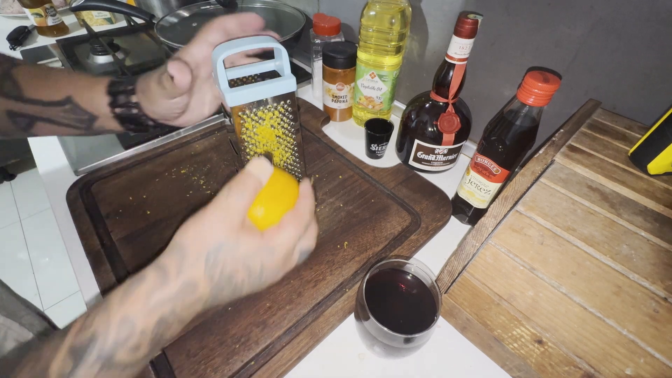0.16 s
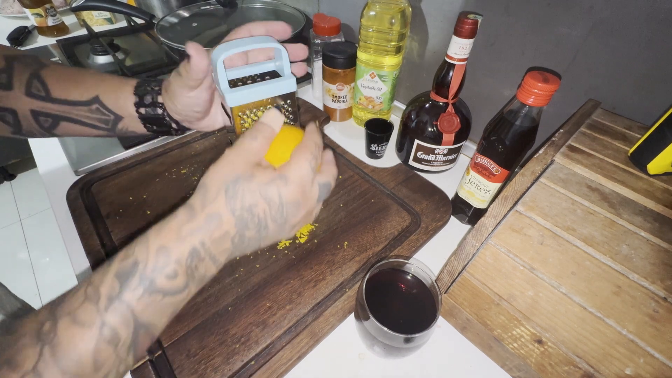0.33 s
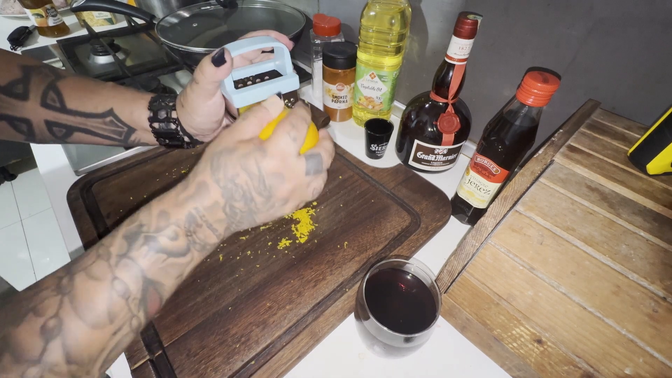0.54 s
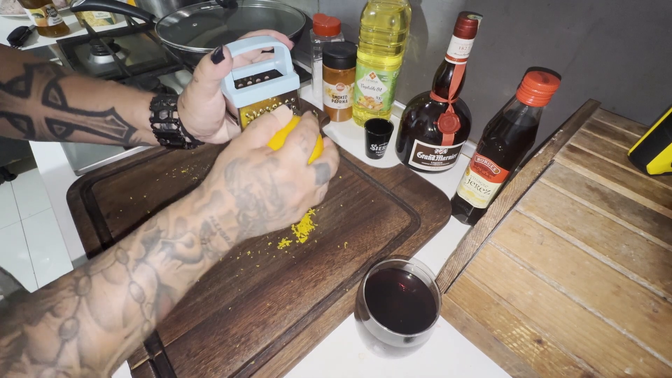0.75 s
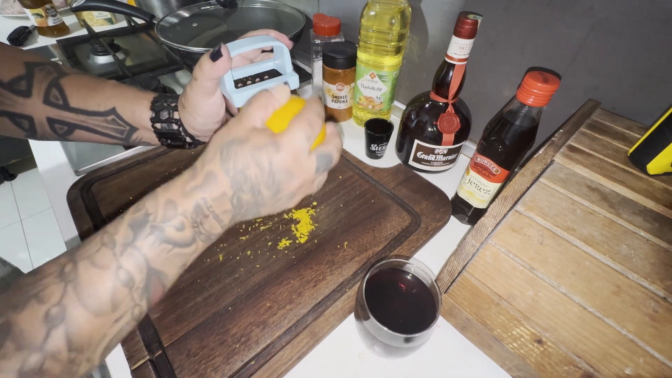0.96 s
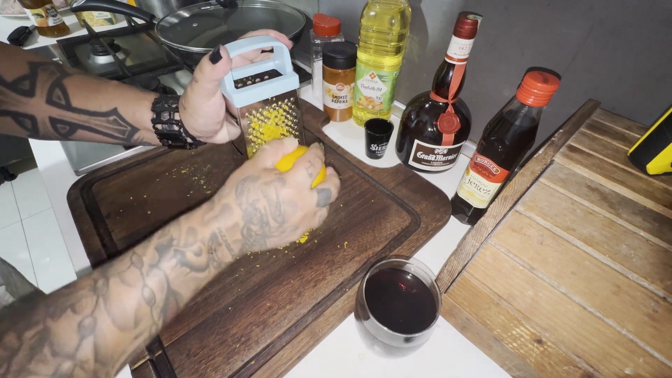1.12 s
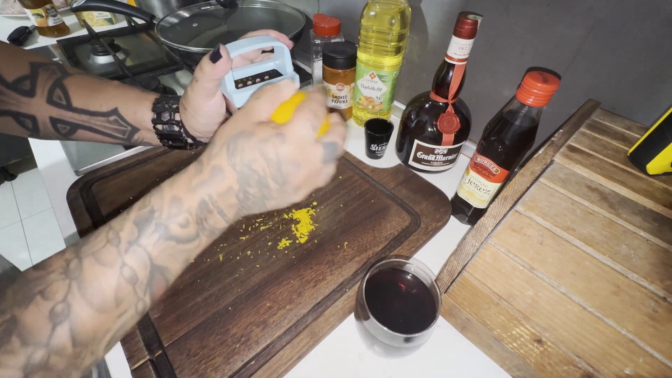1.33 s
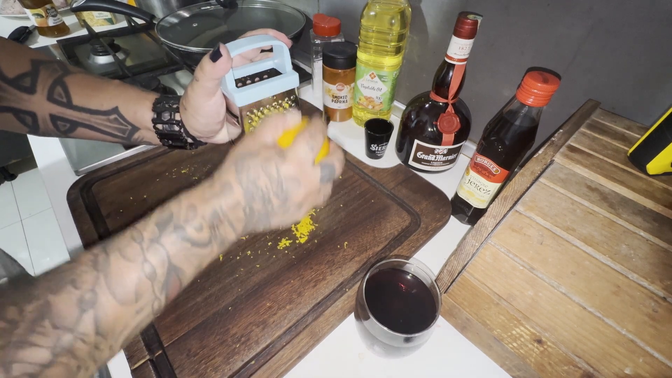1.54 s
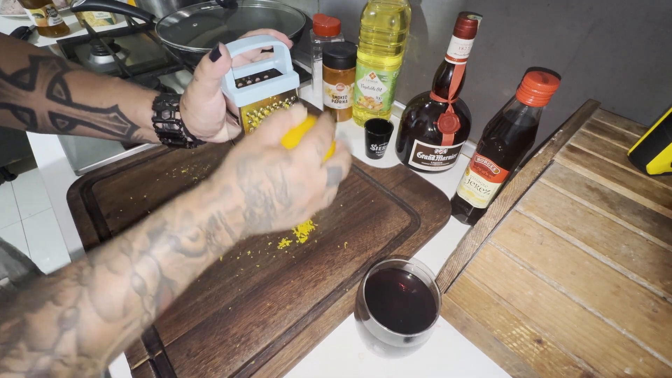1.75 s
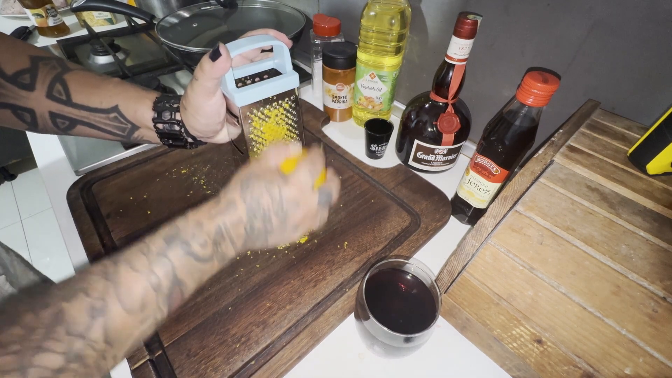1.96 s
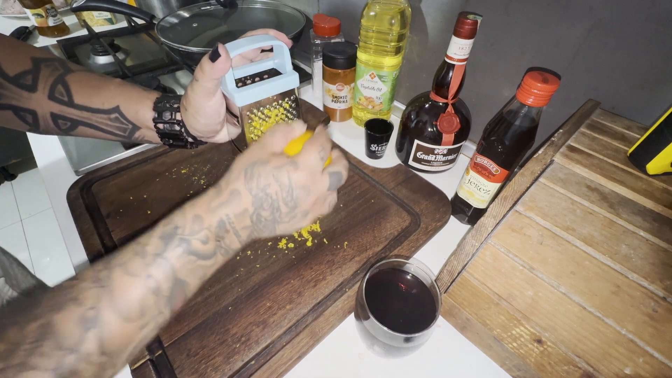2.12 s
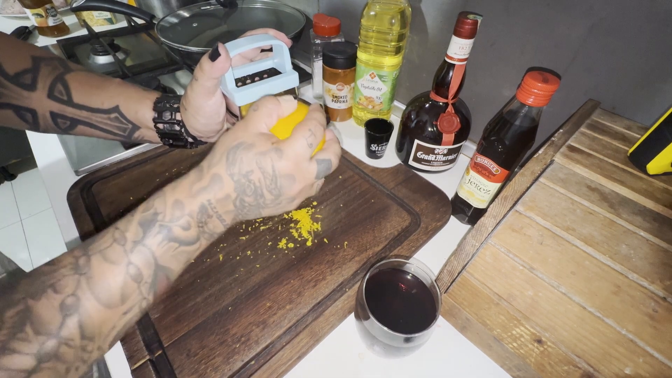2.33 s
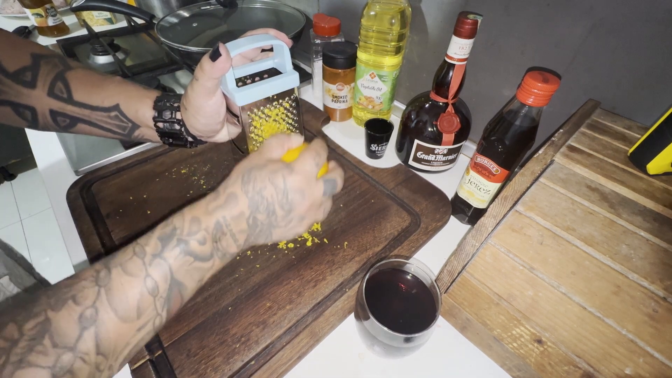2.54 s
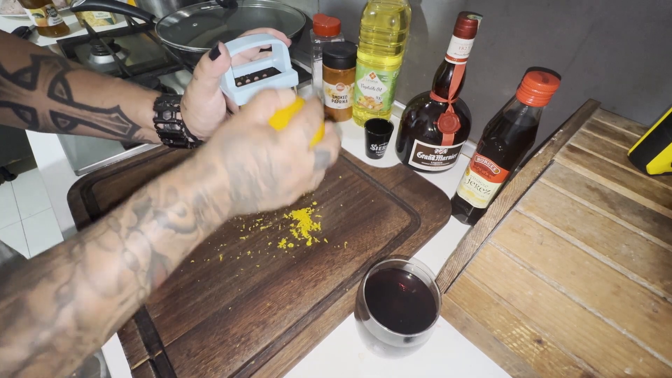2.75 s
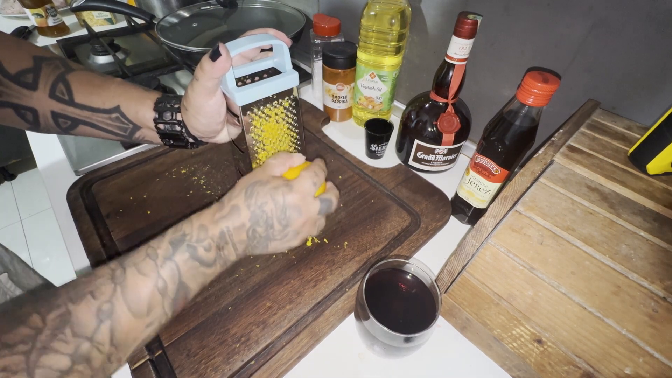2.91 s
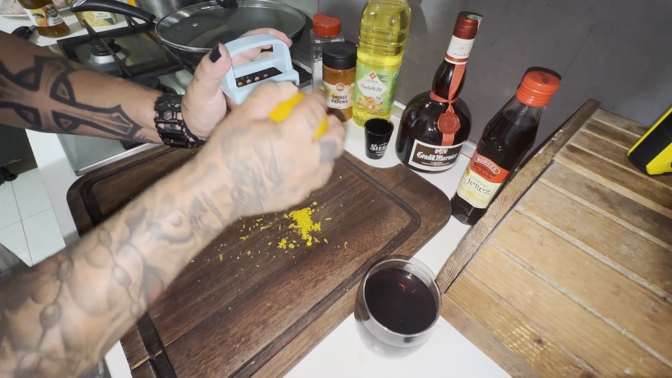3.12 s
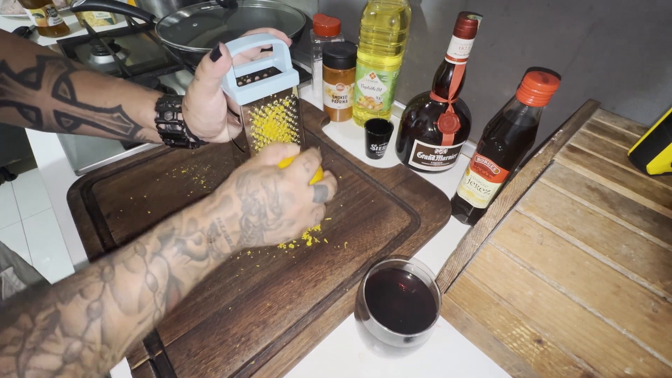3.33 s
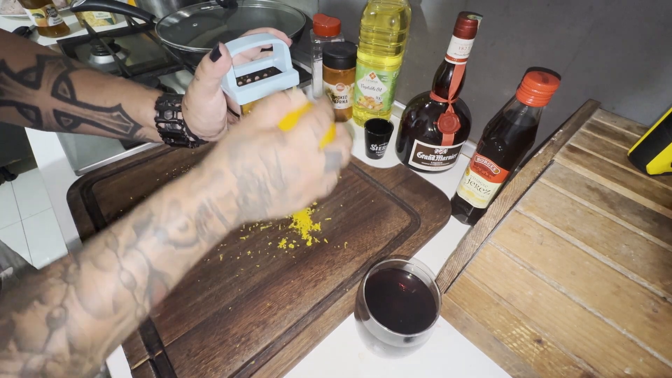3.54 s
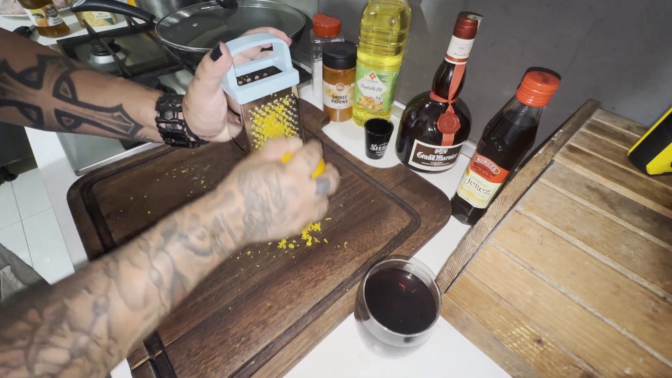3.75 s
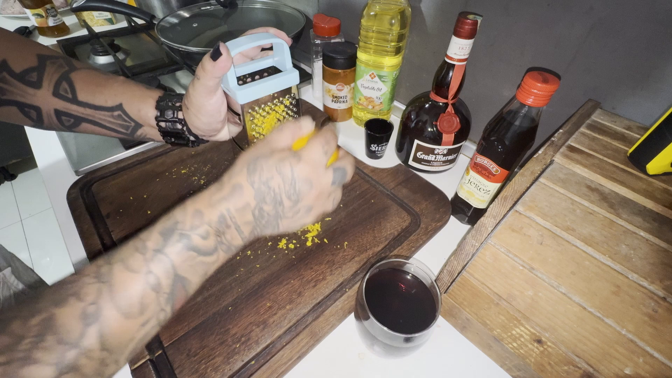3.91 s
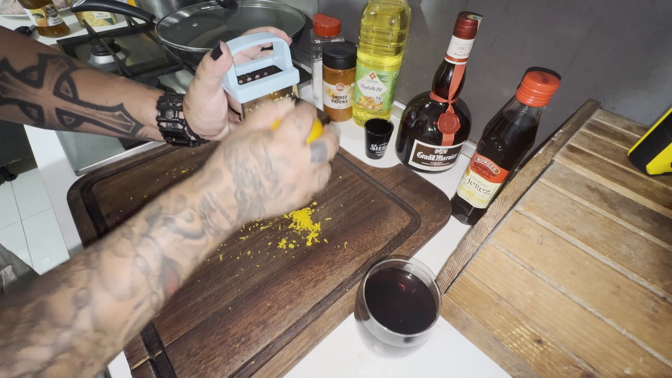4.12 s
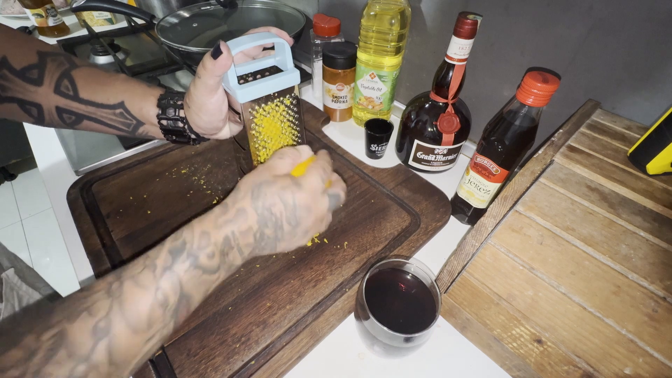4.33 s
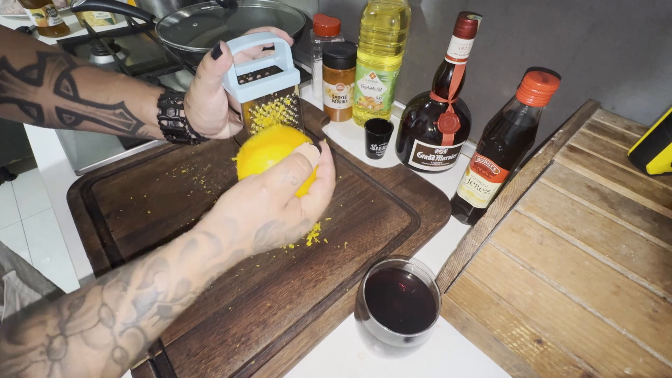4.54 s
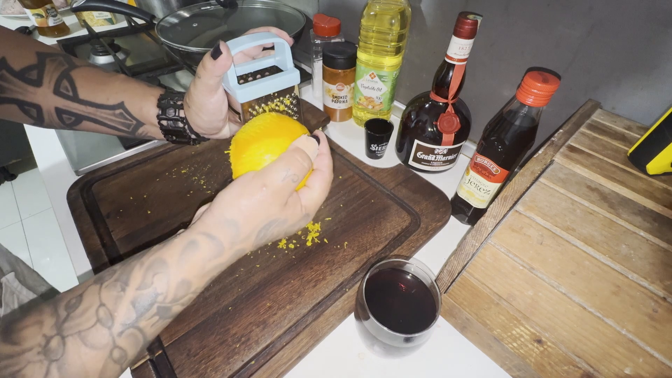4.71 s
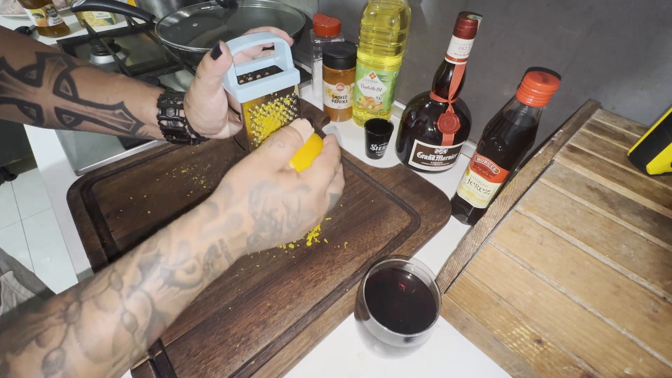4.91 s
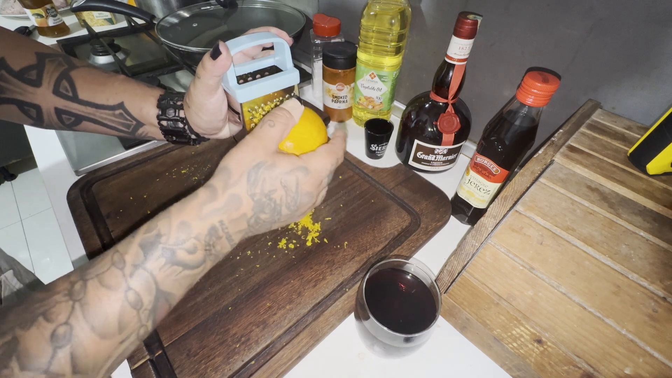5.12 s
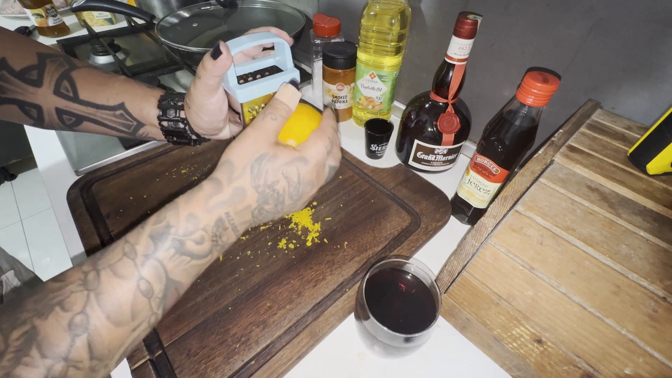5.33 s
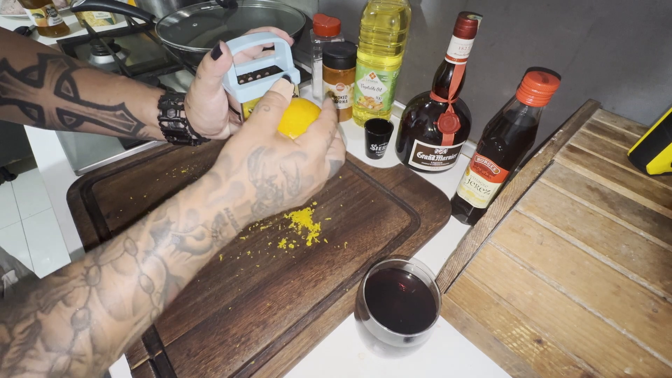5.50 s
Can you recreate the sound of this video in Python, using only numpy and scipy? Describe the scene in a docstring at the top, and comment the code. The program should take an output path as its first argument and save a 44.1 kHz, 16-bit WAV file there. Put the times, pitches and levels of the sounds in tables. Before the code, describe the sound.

A quiet kitchen with a faint, low room noise, heard close in stereo. At about 0.4 s fruit touches a steel grater with a small crunch, and its foot tips onto a wooden board with a dull double thump and short clack. Light touches and a soft bump follow near 0.75 s. From 1.0 s come eight short zesting strokes, starting near 1.0, 1.5, 1.9, 2.4, 2.8, 3.2, 3.6 and 4.05 s, each roughly a tenth of a second or slightly longer. Every stroke is a grainy, wet tearing rasp that swells and stops abruptly, with a brief tinny ring of sheet metal. Low, boomy board thumps accompany and separate them, strong near 2.0 and 2.9 s, heaviest at 4.24 s as the last stroke ends. Small crunches mark the fruit's return between strokes. Afterwards the scraping ceases; only barely audible rubs and touches occur around 4.75 to 5.7 s.

```python
"""In a kitchen, a citrus fruit is zested on a steel box grater that stands on a wooden board.
In each of eight strokes clumped noise snaps tear the peel, hissing and ringing the modes of sheet steel.
The fruit touches the teeth with short crunches, and sinking low cycles thump the grater's foot on the board.
After the strokes the fruit is only turned in the hand: light rubs and touches, over a faint room noise."""
import sys
import numpy as np
from scipy import signal
from scipy.fft import rfft, irfft, next_fast_len
from scipy.io import wavfile
from scipy.ndimage import map_coordinates

SR = 44100
rng = np.random.default_rng(int(sys.argv[2]) if len(sys.argv) > 2 else 0)


def file_out(sig):
    """Save sig as 16-bit WAV at sys.argv[1]."""
    # one column per channel
    cols = np.atleast_2d(sig).T
    # limit, then scale
    lim = np.clip(cols, -1, 1)
    pcm = np.round(lim * 32767).astype(np.int16)
    wavfile.write(sys.argv[1], SR, pcm)


N = 249955
TIME = np.arange(N) / SR
SIZE = next_fast_len(N + SR)
HZ = np.fft.rfftfreq(SIZE, 1 / SR)

# The grater's foot thumps on the board; levels are relative within each layer:
# start_s, thump_level_db, settled_pitch_hz, dull_knock_level_db, rock_back_against_thump_db
THUMPS = [(0.423, -39, 100, -31.5, -21), (0.443, -25, 92, -22.5, -14), (0.467, -25.5, 115, -33, -18.5),
          (0.759, -27, 85, -37, -10.5), (0.96, -24, 106, -33, -12.5), (1.079, -31, 101, -41.5, -15.5),
          (1.196, -24.5, 106, -37.5, -10.5), (1.366, -24.5, 98, -26.5, 1), (1.536, -30, 92, -40, -11),
          (1.702, -23, 108, -28.5, -11.5), (1.879, -29, 85.5, -41, -14.5),
          (1.961, -24.5, 121, -40.5, -16.5), (2.012, -16, 100.7, -38.5, -11), (2.254, -22, 115, -28.5, -5),
          (2.386, -28.5, 103, -47, -6), (2.735, -24, 90, -28.5, -2), (2.919, -15, 82, -41, -6),
          (3.163, -29, 62, -33, -0.5), (3.253, -21.5, 110, -43, -9.5), (3.345, -22.5, 102, -41.5, -13),
          (3.539, -35.5, 76, -52.5, -11), (3.605, -27.5, 101, -35, -9), (3.789, -26.5, 85, -47, -10.5),
          (3.972, -36.5, 90, -58.5, -14.5), (4.042, -33, 98, -28, -10.5), (4.24, -10.5, 83.7, -31, -8.5),
          (4.399, -33, 69, -42, -13), (4.519, -41, 101, -63, -9.5), (5.491, -44.5, 113, -66.5, -7)]


def gain_of(db):
    """Decibels to amplitude."""
    return 10 ** (np.asarray(db) / 20)


def evened(x):
    """Scales to an rms of one."""
    return x / np.sqrt(np.mean(np.abs(x) ** 2) + 1e-20)


def read(points, hz):
    """Reads a table of (Hz, value) on a log-frequency axis."""
    point_hz, value = np.transpose(points)
    return np.interp(np.log(hz + 1), np.log(point_hz + 1), value)


def add(mix, s, sound):
    """Adds a sound at time s, cut off at the end of the mix."""
    part = mix[max(round(s * SR), 0):][:len(sound)]
    part += sound[:len(part)]


def colour(x, gain):
    """Causal minimum-phase filter with the given gain at each frequency."""
    log_gain = np.log(np.maximum(gain, 1e-5))
    # folding the cepstrum onto positive times makes the filter causal
    cepstrum = irfft(log_gain, SIZE)
    cepstrum[1:SIZE // 2] *= 2
    cepstrum[SIZE // 2 + 1:] = 0
    response = np.exp(rfft(cepstrum))
    return irfft(rfft(x, SIZE) * response, SIZE)[:N]


def ring(x, modes):
    """Sum of damped resonances (Hz, dB, t60 s), each with its dB as the gain at its peak."""
    out = np.zeros_like(x)
    for hz, db, t60 in modes:
        decay = gain_of(-60 / (t60 * SR))  # amplitude kept per sample
        pole = decay * np.exp(2j * np.pi * hz / SR)
        # the tiny offset keeps the filter out of very slow arithmetic
        resonance = signal.lfilter([1 - decay], [1, -pole], x + 1e-18).real
        out += 2 * gain_of(db) * resonance
    return out


def wander(rate_hz):
    """Smooth random curve with an rms of one, through two random knots per cycle of its rate."""
    knots = rng.standard_normal(N // 50)
    return evened(map_coordinates(knots, [TIME * 2 * rate_hz + 5], order=2))


def shifting(x, paths, rate_hz):
    """Sends a sound over several paths whose shares drift at random, so no fixed colour stands out."""
    shares = np.array([wander(rate_hz) for path in paths])
    shares /= np.linalg.norm(shares, axis=0)
    return sum(signal.oaconvolve((x * share)[None], path, axes=1)[:, :N]
               for share, path in zip(shares, paths))


def quiet_kitchen(level_db=-55.5):
    """The quiet kitchen is two unrelated steady noises of one colour."""
    # Colour of the room noise: frequency_hz, relative_density_db_per_hz
    floor_colour = [(15, -37.5), (25, -12), (54, 5), (106, 1), (309, -15), (927, -20), (1810, -29),
                    (2300, -29), (3180, -38), (7480, -47), (11200, -40), (15000, -50.5)]
    noise = rfft(rng.standard_normal((2, SIZE)))
    return gain_of(level_db) * evened(irfft(noise * gain_of(read(floor_colour, HZ)), SIZE)[:, :N])


def kitchen(x, build_s=0.0011, drift_hz=14, count=7):
    """The room answers with diffuse noise tails in which each band dies at its own speed."""
    # Reverberation of the kitchen: frequency_hz, t60_s
    band_t60 = [(100, 0.58), (500, 0.7), (1300, 0.68), (3500, 0.56), (8000, 0.44), (15000, 0.34)]
    hz, t, bands = signal.stft(rng.standard_normal((count, 2, SR)), SR, nperseg=256)
    decay = gain_of(-60 * t / read(band_t60, hz)[:, None])
    tails = signal.istft(bands * decay, SR, nperseg=256)[1][..., :SR]
    tails *= 1 - np.exp(-(TIME[:SR] / build_s) ** 2)
    return shifting(x, tails / np.linalg.norm(tails[0, 0]), drift_hz)


def ports(pair):
    """The two microphone ports share part of the sound, shifted in phase and level."""
    # Likeness of the ports: frequency_hz, share (below 0 counts as 0)
    likeness = [(100, 1), (250, 0.35), (450, -0.88), (900, 0.3), (1300, 0.2), (3000, 0), (5000, 0.15),
                (8500, 0.29), (11200, 0.9)]
    # Phase by which left leads: frequency_hz, lead_rad
    lead = [(200, 0), (550, -.5), (900, -2.8), (1400, -3.6), (2400, -3.6), (3100, -3.1), (6200, 0),
            (7800, .8), (9800, -3.14), (11300, -6.28), (12650, -9.42), (14100, -12.57), (15500, -15.7)]
    # Left minus right: frequency_hz, difference_db
    balance = [(60, 0), (180, -2.5), (380, 4.5), (700, 1), (1500, 5), (2300, 1.5), (4400, 7.5), (9000, 1),
               (15000, -1)]
    left, other = rfft(pair, SIZE)
    same = np.clip(read(likeness, HZ), 0, 1)
    tilt = gain_of(read(balance, HZ) / 2)
    right = same * left + np.sqrt(1 - same ** 2) * other
    right = right * np.exp(-1j * read(lead, HZ))
    return irfft([left * tilt, right / tilt], SIZE)[:, :N]


def board(drag, rise_s=0.0034, fall_s=0.01, sag=0.28, sag_s=0.0031):
    """Low cycles sinking in pitch, and the shudder of the strokes, leave the board booming briefly."""
    # Modes of the board and worktop: pitch_hz, peak_gain_db, t60_s
    board_modes = [(57, -4, 0.083), (77.9, -1.5, 0.33), (104.9, -2.5, 0.42), (166, 2.5, 0.21),
                   (250, -4.5, 0.17)]
    rock_s, rock_pitch = .042, 0.63  # the grater rocks back once after a thump, later and lower
    shudder_db, shudder_hz, shudder_width_hz = -13.5, 79.5, 92  # shudder against the drag of a stroke
    blows, t = np.zeros(N), TIME[:SR // 4]
    shape = (1 - np.exp(-t / rise_s)) ** 2 * np.exp(-t / fall_s)
    shape = shape / shape.max()
    for s, db, hz, _, rock_db in THUMPS:
        turns = np.cumsum(hz * (1 + sag * np.exp(-t / sag_s))) / SR
        thump = -shape * np.sin(2 * np.pi * turns)
        rock = -shape * np.sin(2 * np.pi * rock_pitch * turns)
        add(blows, s, gain_of(db) * thump)
        add(blows, s + rock_s, gain_of(db + rock_db) * rock)
    shudder_band = 1 / (1 + (2 * (HZ - shudder_hz) / shudder_width_hz) ** 4)
    shudder = evened(colour(rng.standard_normal(N), shudder_band))
    blows += gain_of(shudder_db) * drag * shudder
    return gain_of(-1.5) * blows + gain_of(-0.5) * ring(blows, board_modes)


def knocks(rise_s=0.0027, fall_s=0.019, lag_s=.003):
    """The soft fruit deadens the knock of each thump to a short, dull burst of noise."""
    # Colour of a knock: frequency_hz, relative_density_db_per_hz
    knock_colour = [(80, -28.5), (180, -0.5), (300, 0.5), (480, -5), (800, -8), (1500, -30), (5000, -60)]
    force, t = np.zeros(N), TIME[:SR // 8]
    shape = (1 - np.exp(-t / rise_s)) * np.exp(-t / fall_s)
    for s, _, _, knock_db, _ in THUMPS:
        add(force, s + lag_s, gain_of(knock_db) * shape)
    burst = force * rng.standard_normal(N)
    return gain_of(-4.5) * colour(burst, evened(gain_of(read(knock_colour, HZ))))


def clack(start_s=0.465, level_db=-20.5, rise_s=0.0026, fall_s=0.0049):
    """Gripped, the grater tips back onto its foot: the steel rim chatters on wood as a noise burst."""
    # Colour of the clack: frequency_hz, relative_density_db_per_hz
    clack_colour = [(150, -8), (450, -5.5), (780, 1.5), (1000, 9), (1250, -4.5), (1600, -12), (3000, -18.5),
                    (6000, -31), (15000, -46)]
    t = np.maximum(TIME - start_s, 0)
    force = (1 - np.exp(-t / rise_s)) * np.exp(-t / fall_s)
    burst = force / force.max() * rng.standard_normal(N)
    return gain_of(level_db) * colour(burst, evened(gain_of(read(clack_colour, HZ))))


def contact(start, end, rise_s, release_db_per_s):
    """Amplitude of a contact that eases in, holds until its end and dies away."""
    rise = np.sin(np.pi / 2 * np.clip((TIME - start) / rise_s, 0, 1)) ** 2
    return rise * gain_of(-release_db_per_s * np.maximum(TIME - end, 0))


def landings(rise_s=.0022, fall_s=0.013):
    """Amplitude of fizz and of drive on the sheet in the short crunch of each touch."""
    # The fruit touches the teeth: start_s, relative_fizz_peak_db, relative_sheet_drive_peak_db
    touches = [(0.412, -46, -43), (0.4445, -46, -34.5), (0.749, -53, -45.5), (0.7862, -43, -35.5),
               (0.961, -48, -33), (1.3517, -37, -31), (1.8604, -41, -39.5), (2.271, -39, -35),
               (2.7237, -32.5, -32.5), (3.1549, -38.5, -36.5), (3.435, -50, -40.5), (3.5937, -39.5, -39),
               (4.0233, -49, -38.5), (5.0833, -40.5, -49.5), (5.656, -45.5, -45)]
    out, t = np.zeros((2, N)), TIME[:SR // 10]
    shape = (1 - np.exp(-t / rise_s)) ** 2 * np.exp(-t / fall_s)
    for s, *levels in touches:
        for layer, db in zip(out, levels):
            add(layer, s, gain_of(db) * shape / shape.max())
    return out


def rubbing(rise_s=0.04, release_db_per_s=399):
    """Amplitude of fizz and of drive on the sheet while the peel slides lightly, easing in and out."""
    # Light rubs of wet peel on steel: start_s, length_s, relative_fizz_db, relative_sheet_drive_db
    rubs = [(0.495, .15, -55, -56), (1.4, 0.14, -52, -57), (1.65, 0.19, -94, -46), (2.016, 0.056, -66, -50),
            (2.094, 0.028, -42, -28.5), (2.301, 0.086, -39.5, -38.5), (2.95, 0.054, -70, -41),
            (3.375, 0.043, -65, -56), (4.752, .15, -90, -78.5), (4.957, 0.04, -66.5, -73.5),
            (5.084, 0.15, -65, -63.5), (5.314, 0.06, -66, -77), (5.474, 0.099, -61.5, -61.5),
            (5.599, 0.076, -56, -60)]
    return sum(gain_of([[fizz_db], [drive_db]]) * contact(s, s + length, rise_s, release_db_per_s)
               for s, length, fizz_db, drive_db in rubs)


def bump(s, width_s):
    """A brief swell of height one around time s."""
    return np.exp(-np.minimum(((TIME - s) / width_s) ** 2, 20))


def stroking():
    """Amplitude of hiss and of sheet drive: the peel catches, slips, bites deep and runs out."""
    # Strokes down the teeth: start_s, deepest_bite_s, end_s, relative_force_db,
    # swell_start_to_end_db, slip_depth_db (negative: a surge), extra_sheet_drive_db
    strokes = [(1.004, 1.086, 1.15, -27.5, -11.5, 1.5, 1.5), (1.507, 1.585, 1.624, -27, -4.5, 0, 1.5),
               (1.892, 1.985, 1.985, -24.5, -3.5, 0, 2.5), (2.38, 2.453, 2.526, -31.5, -8, -2, 1),
               (2.771, 2.878, 2.913, -27.5, -1.5, 0.5, 2), (3.187, 3.3, 3.335, -29, -3.5, 6.5, 2.5),
               (3.628, 3.724, 3.768, -29.5, 0, 2, 2), (4.063, 4.212, 4.215, -29, 7, -0.5, 0.5)]
    rise_s, release_db_per_s = 0.049, 562  # the teeth sink in, and let go at the end
    slip_share, slip_s = .67, 0.017  # how far along the way to the deepest bite, and width
    bite_db, bite_s = 3.5, 0.011  # extra force of the deepest bite, and its width
    # the sheet answers more as the fruit moves down from the handle
    sheet_swell_db, sheet_release_db_per_s = 4.5, 381
    hiss, drive = np.zeros((2, N))
    for start, bite, end, db, swell_db, slip_db, sheet_db in strokes:
        travel = np.clip((TIME - start) / (end - start), 0, 1) - .5
        slip = bump(start + slip_share * (bite - start), slip_s)
        force_db = db + swell_db * travel - slip_db * slip + bite_db * bump(bite, bite_s)
        hiss += gain_of(force_db) * contact(start, end, rise_s, release_db_per_s)
        drive_db = force_db + sheet_db + sheet_swell_db * travel
        drive += gain_of(drive_db) * contact(start, end, rise_s, sheet_release_db_per_s)
    return hiss, drive


def tears(per_s, spread_db, catch_db, catch_hz, smear):
    """Tiny snaps of peel over a smooth wet slide, clumped as rows of teeth catch and let go."""
    size = gain_of(spread_db * np.minimum(rng.exponential(1, N), 4))
    snaps = size * rng.choice([-1, 1], N) * (rng.random(N) < per_s / SR)
    slide = smear * rng.standard_normal(N)
    return evened((evened(snaps) + slide) * gain_of(catch_db * wander(catch_hz)))


def scatter(x, spread_s, drift_hz, count=4):
    """Sound from many teeth reaches each port by slightly smeared paths whose shares drift fast."""
    smears = rng.standard_normal((count, 2, SR // 25)) * np.exp(-TIME[:SR // 25] / spread_s)
    paths = rfft(smears)
    paths = irfft(paths / np.abs(paths))  # flat spectrum: only the phase is smeared
    paths = np.roll(paths, SR // 2000, axis=2)[..., :SR // 50]
    return shifting(x, paths, drift_hz)


def flexing(x, travel_hz=6):
    """Each broad resonance of the face swells and fades as the fruit travels over its nodes."""
    # Resonances of the face that the fruit presses on: pitch_hz, peak_gain_db, t60_s
    face_modes = [(765, 0, .045), (1000, -8, .035), (1745, 4, .035), (2750, -4, .018)]
    face = sum(ring(x * np.abs(wander(travel_hz)), [mode]) for mode in face_modes)
    return gain_of(-2.0) * (x + face)


def grater(stroke_hiss, stroke_drive, split_hz=2200, hiss_db=3.5, drive_db=0.52):
    """Tearing peel hisses at the teeth and shakes the sheet, which rings on; light contact also fizzes."""
    # Colour of the rasp: frequency_hz, relative_density_db_per_hz
    rasp_colour = [(60, -2.5), (170, -5), (380, -8), (650, -3.5), (880, -7), (1100, 2), (1400, -5.5),
                   (1720, -5), (2250, -10.5), (2800, -6), (4000, -9.5), (5300, -12), (11500, -11.5),
                   (15500, -15.5)]
    # Colour of wet peel sliding: frequency_hz, relative_density_db_per_hz
    fizz_colour = [(500, -34.5), (2000, -3), (5000, -5.5), (8000, -5.5), (11000, 0), (15500, -7)]
    # Modes of the sheet steel: pitch_hz, peak_gain_db, t60_s
    steel_modes = [(748, 3, .3), (790, -1, .3), (880, -3, .12), (945, -3, .25), (1015, -5, .3),
                   (1061, -1, .3), (1167, -2, .35), (1285, -2, .45), (1330, -3, .35), (1460, -3, .2),
                   (1628, -6, .12), (1720, 2, .22), (1807, -2, .16), (2805, -5, .1), (2920, -8, .08),
                   (3490, -7, .1), (3795, -8, .1), (4090, -7, .08), (4506, -8, .08)]
    light_hiss_db, steel_db = -10.5, 1.2  # light contact tears little: its hiss against its drive
    fizz, light_drive = rubbing() + landings()
    peel = tears(per_s=3200, spread_db=1.0, catch_db=1.2, catch_hz=69.7, smear=.35)
    tugs = tears(per_s=1600, spread_db=2.5, catch_db=0.5, catch_hz=59.97, smear=0.43)
    rasp = gain_of(read(rasp_colour, HZ))
    low = 1 / (1 + (HZ / split_hz) ** 8)  # share of power that goes to the sheet drive
    hiss = gain_of(hiss_db) * stroke_hiss + gain_of(light_hiss_db) * light_drive
    drive = gain_of(drive_db) * stroke_drive + light_drive
    sound = colour(peel * hiss, evened(rasp * np.sqrt(1 - low)))
    sound += colour(peel * fizz, evened(gain_of(read(fizz_colour, HZ))))
    sound += colour(tugs * drive, evened(rasp * np.sqrt(low)))
    pair = scatter(sound + clack(), spread_s=.0012, drift_hz=149.63)
    return gain_of(-1.0) * (flexing(pair) + gain_of(steel_db) * ring(pair, steel_modes))


def scene():
    """Grater and board in the quiet kitchen."""
    hiss, drive = stroking()
    thumps, knock = board(hiss), knocks()
    rasp = grater(hiss, drive)
    boom = gain_of(-9.0) * thumps
    room = kitchen(gain_of(-11.0) * (rasp[0] + knock) + boom)
    return ports(rasp + thumps + knock + room + quiet_kitchen())


def record(dry, low_cut_hz=38, edge_hz=15850):
    """The microphone loses the deepest bass; then the recorder's band limit cuts the top."""
    low_cut = signal.butter(4, low_cut_hz, "high", fs=SR, output="sos")
    lean = signal.sosfilt(low_cut, dry)
    band_limit = signal.firwin(511, edge_hz, window=("kaiser", 9), fs=SR)
    return signal.oaconvolve(lean, band_limit[None], "same")


dry = scene()
out = record(dry)
file_out(out)
```